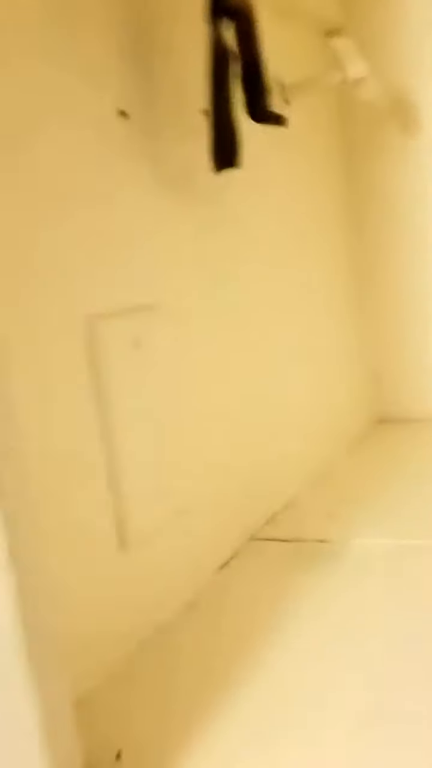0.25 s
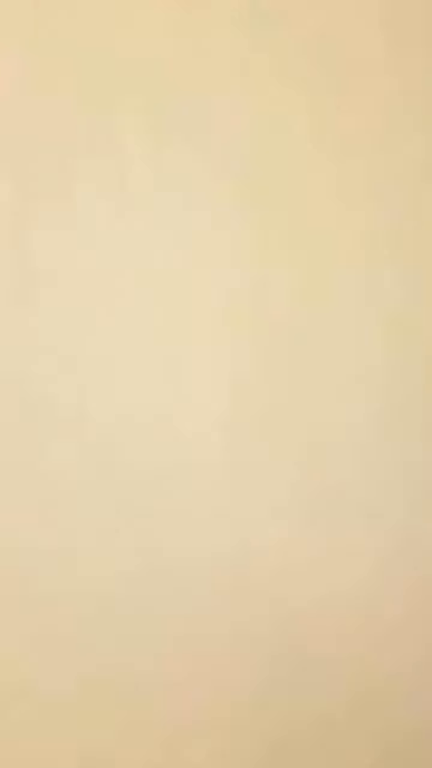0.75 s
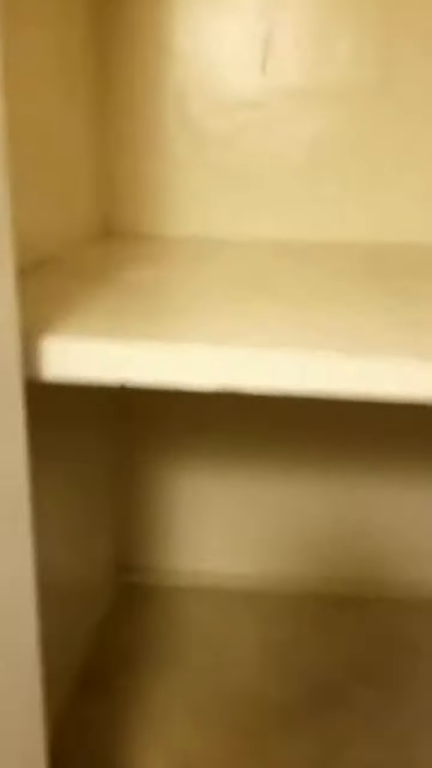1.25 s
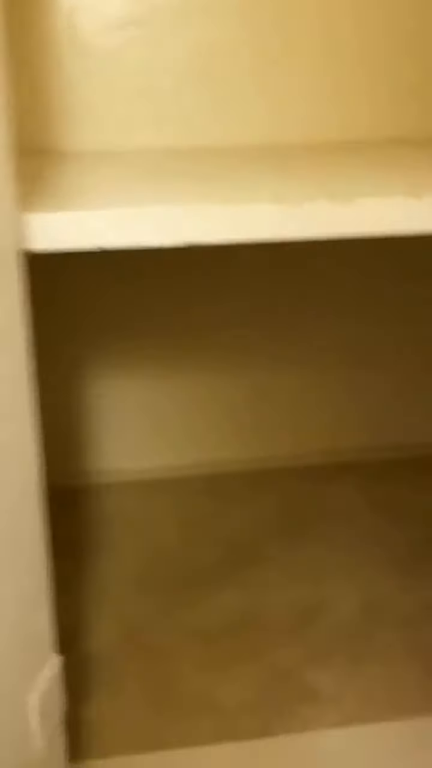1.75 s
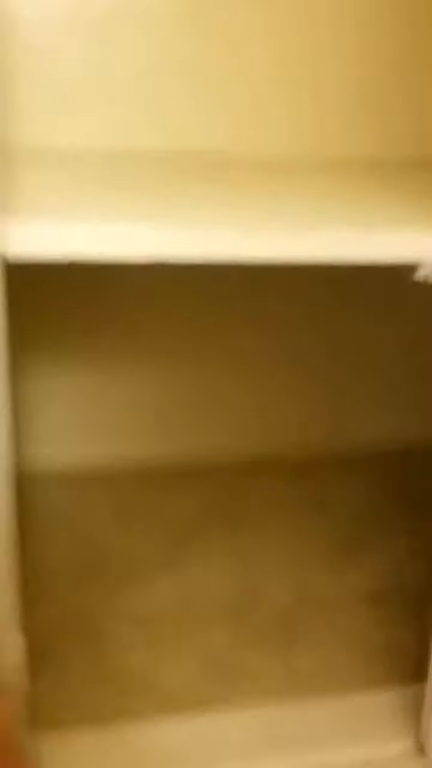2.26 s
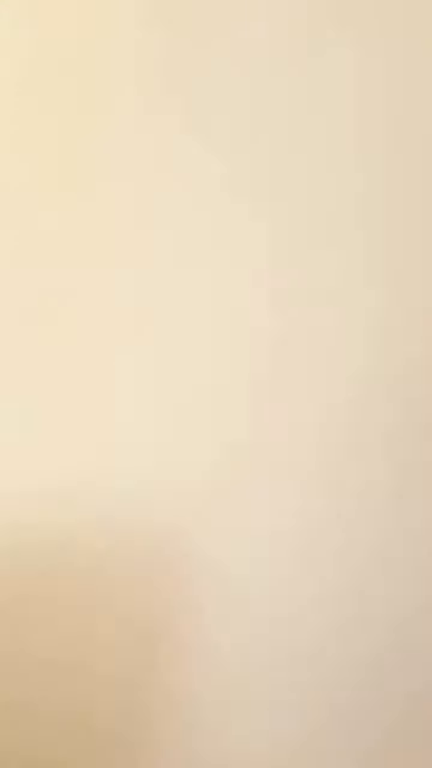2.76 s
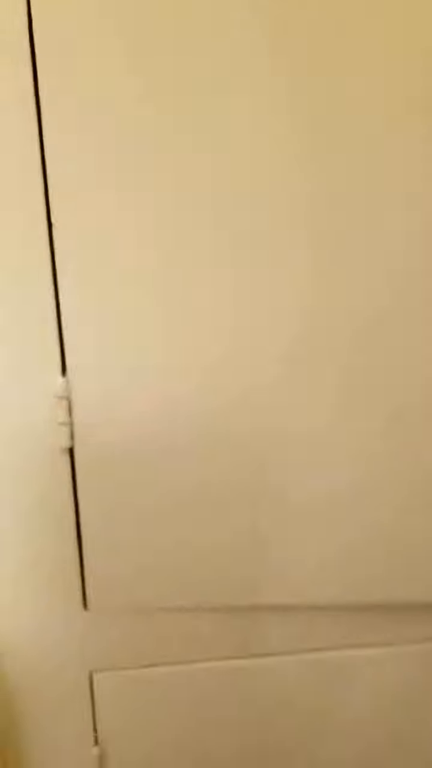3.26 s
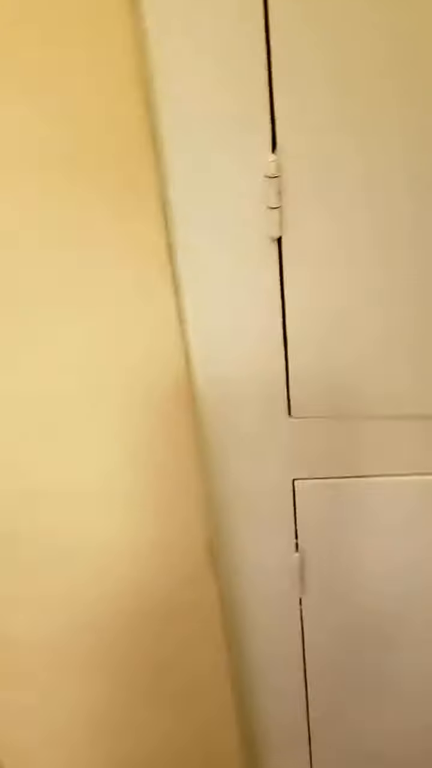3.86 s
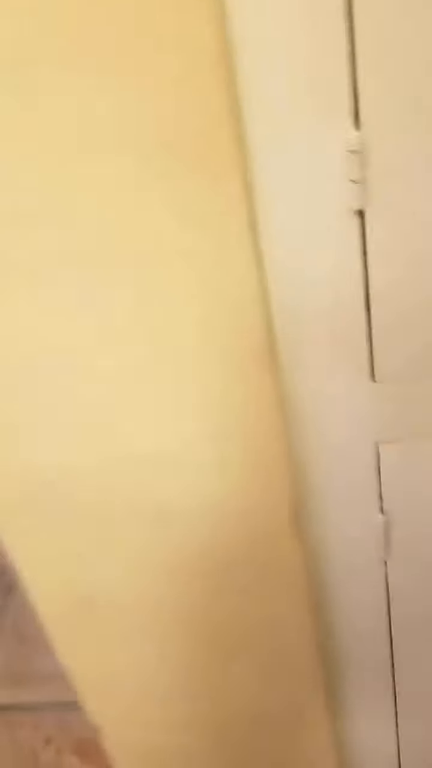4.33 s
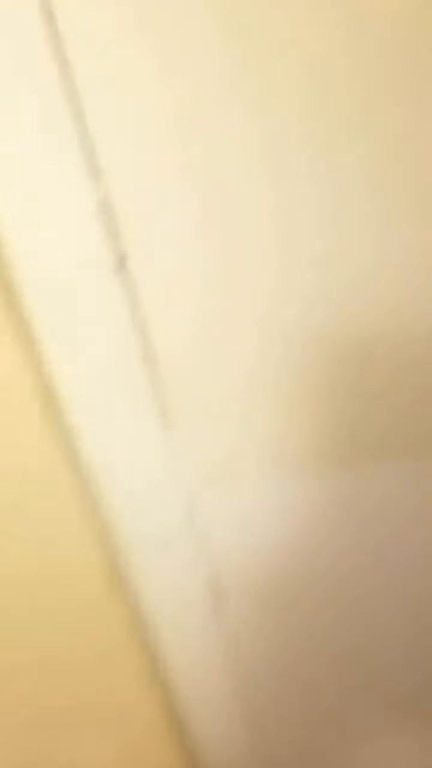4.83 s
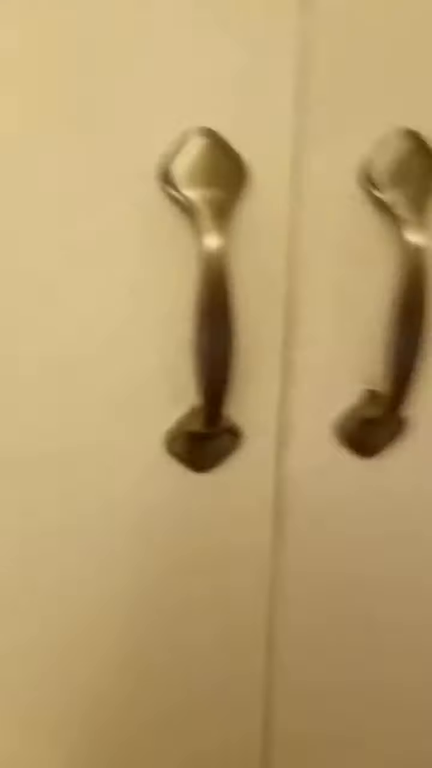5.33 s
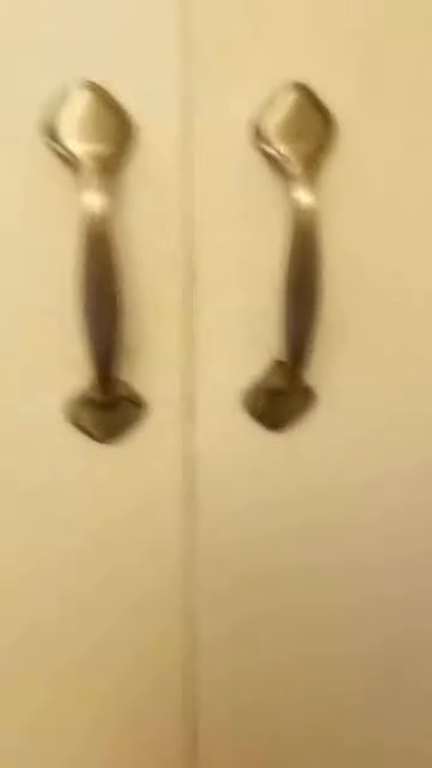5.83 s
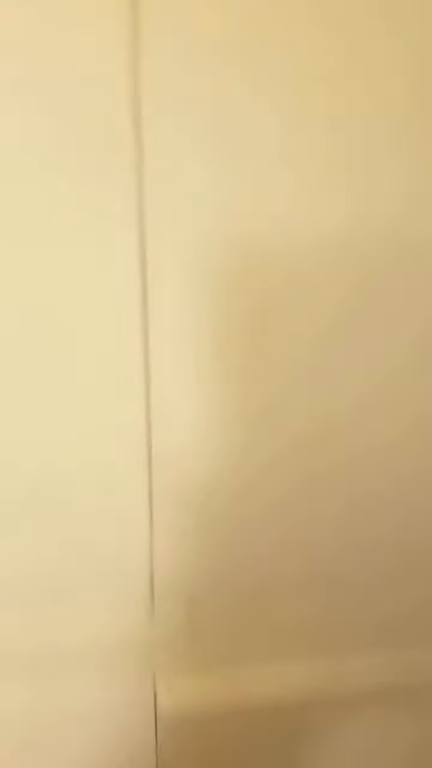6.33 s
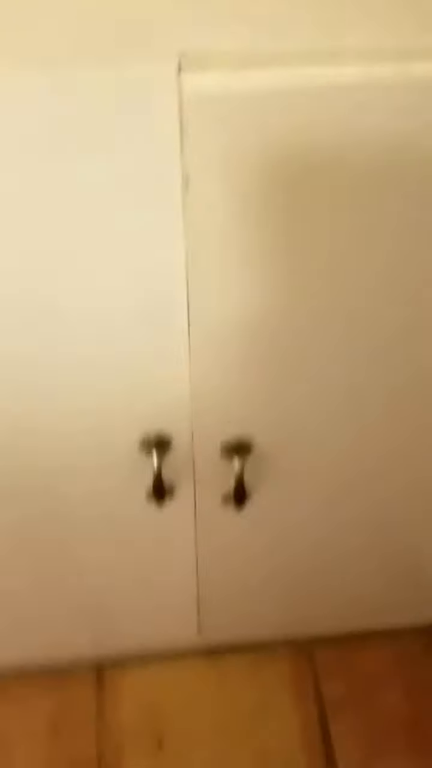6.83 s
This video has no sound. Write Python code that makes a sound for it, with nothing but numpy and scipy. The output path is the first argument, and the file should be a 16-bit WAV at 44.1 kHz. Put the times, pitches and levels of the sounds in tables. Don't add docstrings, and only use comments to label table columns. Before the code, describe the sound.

Soft cloth rustle and a few light knocks, then a sharp wooden door slam with a long echo. Scuffing feet lead to a second, clattering slam, and soon a third, loudest, which springs back and bangs again. The echo fades under quiet rustling, scrapes and dull final knocks. Stereo phone pickup, close, in an empty hard-walled house.

```python
import sys
import numpy as np
from scipy import signal
from scipy.io import wavfile
from scipy.ndimage import uniform_filter1d

SR = 44100
rng = np.random.default_rng(int(sys.argv[2]) if len(sys.argv) > 2 else 0)


def wav_record(signal):
    frames = np.transpose(np.atleast_2d(signal))
    bounded = np.clip(frames, -1, 1)
    quanta = np.round(bounded * 32767).astype(np.int16)
    wavfile.write(sys.argv[1], SR, quanta)


def invert_db(level):
    return 10 ** (np.asarray(level, dtype=float) / 20)


N = 312644


def evened(x):
    return x / np.sqrt(np.mean(x ** 2) + 1e-20)


def read(points, hz):
    f, value = np.transpose(points)
    return np.interp(np.log(hz + 1), np.log(f + 1), value)


def add(mix, s, sound):
    part = mix[:, round(s * SR):][:, :sound.shape[1]]
    part += sound[:, :part.shape[1]]


def coloured(x, spectrum, peak_hz, peak_db):
    hz = abs(np.fft.fftfreq(2048, 1 / SR))
    resonance_db = peak_db * np.exp(-(np.log((hz + 1) / peak_hz) / 0.33) ** 2)
    db = np.maximum(read(spectrum, hz) + resonance_db, -100)
    response = np.exp(np.conj(signal.hilbert(np.log(invert_db(db)))))
    taps = np.fft.ifft(response).real[:1024]
    return signal.fftconvolve(x, taps[None] / np.linalg.norm(taps), axes=1)


def noise(length, field_db):
    # (frequency [Hz], correlation [-1..1])
    likeness = [(40, 0.89), (150, 0.88), (330, 0.96), (600, 0.54), (2000, 0.071), (12000, 0.062)]
    frames, hz = length // 64 + 5, np.fft.rfftfreq(1024, 1 / SR)[:, None]
    a, b, c, d = rng.standard_normal((frames // 4 + 4, 513, 4)).T
    same = np.clip(read(likeness, hz), -1, 1)
    left = a + 1j * b
    right = same * left + np.sqrt(1 - same ** 2) * (c + 1j * d)
    z = np.array([left, right])
    t = np.arange(z.shape[2]) * 256 / SR
    return signal.istft(z * invert_db(field_db(hz, t)), nperseg=1024, noverlap=768)[1][:, :length]


def strokes(rows):
    rise_share, stop_s = 0.38, 0.033
    start, length, level_db, sag_db = np.transpose(rows)[:4, :, None]
    t = np.arange(0, N + 64, 64) / SR - start
    rise = np.sin(np.pi / 2 * np.clip(t / (rise_share * length), 0, 1)) ** 2
    stop = np.exp(-np.maximum(t - length, 0) / stop_s)
    return invert_db(level_db + sag_db * np.clip(t / length, 0, 1)) * rise * stop


def blows(rattle):
    same = 0.25
    t = np.arange(4096) / SR
    uneven = invert_db(1.555 * rng.exponential(1, 4096).clip(0, 4))
    left, other = rng.standard_normal((2, 4096)) * uneven
    right = same * left + np.sqrt(1 - same ** 2) * other
    return np.array([left, right]) * np.exp(-(t / max(rattle, .001)) ** 2) / 1.823


def tick(rattle):
    # (frequency [Hz], level [dB per Hz])
    metal = [(2940, 2.5), (5000, -5.5), (6800, -8.5), (8180, -27), (11000, -18.5), (15500, -19)]
    snap = np.exp(-np.arange(4096) / SR / 0.0034) + 0.81
    return coloured(blows(rattle) * snap, metal, 8400, 7.0)


def contacts(rows, panel):
    # (frequency [Hz], level [dB per Hz])
    wood = [(180, -24.5), (300, -2.5), (447, -4.5), (675, -3), (743, -7), (1220, -9.5), (1500, -10.5),
            (1940, -10), (3920, -21.5), (8000, -43.5), (10400, -56), (17600, -120)]
    tick_under_db = -28
    out, t = np.zeros((2, N)), np.arange(SR // 2) / SR
    bass = signal.butter(2, 450, fs=SR)
    modes = np.array([invert_db(db - 60 * t / t60) * np.exp(2j * np.pi * hz * t) for hz, db, t60 in panel])
    swing = 1 - np.exp(-t / 0.006)
    for s, crack_db, panel_db, rattle, crack_hz in rows:
        crack = coloured(blows(rattle), wood, crack_hz, 7.35)
        crack[1] += signal.lfilter(*bass, crack[0] - crack[1])
        add(out, s, invert_db(crack_db) * (crack + invert_db(tick_under_db) * tick(rattle)))
        phases = np.exp(1j * rng.uniform(-0.19, 1, len(panel)))
        ring = (phases @ modes).imag
        add(out, s, invert_db(panel_db) * ring[None] * swing)
    return out


def quiet():
    # (frequency [Hz], level [dB per Hz])
    wash = [(15, -31.5), (30, 10.5), (126, 6), (300, -7), (900, -11.5), (1600, -16.5), (2600, 1),
            (6700, -20.5), (9500, -31.5), (15500, -21)]
    wash_db, hum_db, hum_hz = -59, -68.5, 120
    wobble = evened(uniform_filter1d(rng.standard_normal(N), 3000))
    hum = invert_db(hum_db + 4.7 * wobble) * np.sin(2 * np.pi * hum_hz * np.arange(N) / SR)
    return invert_db(wash_db) * evened(noise(N, lambda hz, t: read(wash, hz) + 0 * t)) + hum


def feet():
    # (start [s], length [s], level [dB], sag over the scrape [dB])
    scrapes = [(-.04, 0.19, -60.5, -11), (.34, 0.12, -62, 2), (.69, .04, -53, -1), (.76, 0.2, -58.5, -1.5),
               (1.03, 0.15, -60, 8.5), (1.18, 0.26, -61.5, 10.5), (2.2, 0.63, -53, -15),
               (2.72, 0.074, -47.5, -6), (2.82, 0.17, -56, 0.5), (2.995, 0.17, -50, -16.5),
               (5.14, .28, -53, -6), (5.42, .35, -57.5, 5.5), (5.79, 0.32, -49.5, -25),
               (6.78, 0.27, -57, -1.5)]
    # (frequency [Hz], level [dB per Hz])
    scuff = [(90, -27.5), (180, -4.5), (450, -5), (900, -10.5), (1800, -20.5), (4000, -42.5)]
    level = np.repeat(strokes(scrapes).sum(0), 64)[:N]
    return level * evened(noise(N, lambda hz, t: read(scuff, hz) + 0 * t))


def cloth():
    # (start [s], length [s], hiss [dB], sag over the stroke [dB], body above the hiss [dB])
    rubs = [(-.08, .3, -70, -1.5, 3.5), (0.193, 0.46, -44, -29.5, 12.5), (0.682, 0.22, -54, -3.5, -6.5),
            (0.933, 0.37, -65.5, -2, -8.5), (1.196, 0.22, -43, -10, 3.5), (1.607, 0.063, -59.5, -14, 5),
            (2.048, 0.023, -72, 5, -10), (2.131, 0.24, -59.5, -12.5, -4.5), (2.48, 0.16, -74, -3, -12.5),
            (2.651, 0.31, -70, -5.5, 9), (3.1, 0.31, -62.5, -14, 3.5), (3.53, 0.039, -60, -3.5, -1.5),
            (3.802, 0.13, -61, -20, -9.5), (4.78, 0.12, -47, -16.5, -6), (4.96, 0.54, -69.5, -25, 1.5),
            (5.384, 0.19, -63, -10.5, 5.7), (5.584, 0.11, -58.5, 2, -5), (5.732, 0.4, -76.5, -1, 14.5),
            (6.066, 0.24, -67, -7, 2), (6.275, 0.29, -57, -15.5, 3.5), (6.57, 0.18, -51.5, -4, -3),
            (6.696, 0.13, -68, -1.5, 14.5), (6.804, 0.25, -53, -17.5, -4)]
    # (frequency [Hz], level [dB per Hz])
    swish = [(180, -46.5), (300, -27.5), (620, -18.5), (800, -16), (1640, -11), (2250, -5.5), (3800, -7.5),
             (6600, -7.5), (8700, -18.5), (11000, -19), (15700, -18.5)]
    # (frequency [Hz], share [0..1])
    body_share = [(400, 0.67), (2500, 0.84), (5000, 0.18), (7500, 0.15), (11000, 0)]
    each = strokes(rubs) + 1e-9
    level, s = each.sum(0), np.arange(each.shape[1]) * 64 / SR
    body_db = np.transpose(rubs)[4] @ each / level
    grain = uniform_filter1d(rng.standard_normal((N // 256 + 9, 513)), 8, 0)
    patches = 1.2 * evened(uniform_filter1d(grain, 14, 1)).T

    def field_db(hz, t):
        body = read(body_share, hz) * np.interp(t, s, body_db)
        return read(swish, hz) + body + patches[:, :len(t)]

    rub = noise(N, field_db)
    hiss = signal.sosfilt(signal.butter(4, 8000, "high", fs=SR, output="sos"), rub)
    return rub * np.repeat(level, 64)[:N] / np.sqrt(np.mean(hiss ** 2))


def bump():
    start_s, level_db, tap_hz, pan_db = 2.869, -38, 111, 25
    t = np.arange(N) / SR - start_s
    tap = -np.exp(-(t / 0.0077) ** 2) * np.cos(2 * np.pi * tap_hz * t)
    return invert_db(level_db + np.array([[.5], [-.5]]) * pan_db) * tap


def catches():
    # (time [s], level [dB], rattle [s])
    clicks = [(.68, -46, .006), (.905, -43.5, .011), (1.47, -26.5, .035), (1.497, -46, .047),
              (2.071, -49, .02), (3.183, -35, .032), (3.267, -29, .03), (3.273, -27.5, .042),
              (3.284, -30.5, .01), (3.338, -34, .008), (3.372, -27, .003), (3.549, -45.5, .01),
              (3.805, -40.5, .0033), (4.142, -28, 0.032), (4.156, -30, 0.019), (4.26, -39.5, .02),
              (4.295, -31.5, .046), (4.319, -30, .0031), (4.329, -21.5, 0.0023), (4.418, -39, .008),
              (4.793, -36, .02)]
    out = np.zeros((2, N))
    for s, db, rattle in clicks:
        add(out, s, invert_db(db) * tick(rattle))
    return out


def knocks():
    # (time [s], crack [dB], panel [dB], rattle [s], crack resonance [Hz])
    taps = [(.455, -40, -57, 0.037, 620), (.497, -31, -42.5, 0.013, 1160), (.515, -37, -65, 0.025, 890),
            (.5, -36, -62.5, .03, 257), (.6, -61, -52, .03, 300), (1.15, -51, -53, 0.012, 485),
            (1.19, -64, -50, 0.015, 500), (2.748, -52.5, -51.5, 0.042, 715), (3.15, -45, -47, 0.007, 2523),
            (3.183, -42, -52, 0.04, 2470), (3.549, -66, -52.5, .01, 3754),
            (3.806, -54.5, -45.5, 0.003, 4140), (6.70, -70, -46, 0.026, 496),
            (6.735, -47, -37.5, 0.051, 583), (6.775, -48.5, -35, 0.073, 566), (6.85, -53, -44.5, 0.11, 553)]
    # (frequency [Hz], level [dB], t60 [s])
    boards = [(67.6, 5, 0.36), (110.6, 3.5, 0.31), (187, -6.5, 0.18), (400, -18.5, 0.25)]
    return contacts(taps, boards)


def first_door():
    # (time [s], crack [dB], panel [dB], rattle [s], crack resonance [Hz])
    hits = [(1.458, -9.5, -13, 0.026, 1000), (1.468, -10, -8, 0.046, 2240),
            (1.483, -16, -16.5, 0.065, 1270), (1.497, -17.5, -6, 0.091, 875),
            (1.53, -28, -13.5, 0.023, 1320)]
    # (frequency [Hz], level [dB], t60 [s])
    panel = [(45, -17.5, 0.3), (94, 1.5, 0.11), (121, -3, 0.2), (160.6, -10, 0.11), (250.4, -4, 0.21),
             (338, -4, .1), (390.3, -5, 0.21), (570, -25, 0.94)]
    return contacts(hits, panel)


def second_door():
    # (time [s], crack [dB], panel [dB], rattle [s], crack resonance [Hz])
    hits = [(3.266, -11.5, -12, 0.067, 2440), (3.275, -11, -13.5, 0.038, 1390),
            (3.285, -19, -13, 0.0073, 2470), (3.298, -18.5, -11.5, 0.13, 1014),
            (3.333, -14, -33, 0.021, 2350), (3.338, -5, -9, 0.019, 400), (3.362, -24, -16, 0.02, 2380)]
    # (frequency [Hz], level [dB], t60 [s])
    panel = [(42.5, -9, 0.29), (87.3, 5, 0.075), (191.4, 1, 0.2), (261, 1, 0.08), (362.6, 1, 0.091),
             (437.6, -1.5, 0.056), (504.4, 1, 0.04)]
    return contacts(hits, panel)


def third_door():
    # (time [s], crack [dB], panel [dB], rattle [s], crack resonance [Hz])
    hits = [(4.137, -5.5, -6.5, 0.014, 1600), (4.157, -2.5, -7.5, 0.011, 1360),
            (4.19, -24, -24.5, 0.035, 1310), (4.322, -8.5, -8.5, 0.0017, 2480),
            (4.328, -2.5, -15.5, 0.0036, 2260), (4.334, -4.5, -29.5, 0.0086, 2390),
            (4.349, -15.5, -19.5, 0.0073, 2330), (4.42, -25, -24.5, 0.0038, 1500)]
    rebound = [(4.222, -15.5, -12, 0.021, 1290), (4.26, -21, -9.5, 0.079, 700),
               (4.294, -23.5, -8.5, 0.07, 1025)]
    # (frequency [Hz], level [dB], t60 [s])
    panel = [(52, -21, 1), (91.2, -9.5, 0.18), (138.7, -3, 0.13), (194.7, 1, 0.09), (270.5, -9, 0.48),
             (408.5, -6.5, 0.13), (589, -2.5, 0.099)]
    hinged = [(130.7, 0, 0.11), (187.4, -2, 0.18), (273, -19, 0.15), (416, -14.5, 0.39)]
    return contacts(hits, panel) + contacts(rebound, hinged)


def house(x):
    # (frequency [Hz], t60 [s])
    decay = [(40, 1.88), (120, 1.165), (300, 1.706), (1000, 1.903), (2500, 1.464), (4500, 1.04),
             (8000, 0.51), (14000, 0.45)]
    nook_db, nook_t60 = 5, 0.18
    length = 3 * SR // 2

    def field_db(hz, t):
        far = invert_db(-60 * t / read(decay, hz))
        nook = invert_db(nook_db - 60 * t / nook_t60)
        return 20 * np.log10(far + nook)

    tail = noise(length, field_db)
    tail *= 1 - np.exp(-np.arange(length) / SR / 0.0027)
    return signal.fftconvolve(x, tail / np.linalg.norm(tail[0]), axes=1)[:, :N]


def scene():
    doors = [first_door(), second_door(), third_door()]
    handling, rub = knocks() + catches(), cloth()
    sources = doors + [handling + invert_db(3.5) * rub]
    wet_db = (-2.4, -2.1, 1.5, -0.48)
    echoes = sum(invert_db(db) * house(x) for db, x in zip(wet_db, sources))
    return sum(doors) + handling + rub + invert_db(-4) * echoes + bump() + feet() + quiet()


def low_pass(x):
    return signal.sosfilt(signal.butter(12, 16650, fs=SR, output="sos"), x)


def record(dry):
    ceiling, mic_low_hz, edge_hz = 0.95, 38, 15740
    power_db = 10 * np.log10(abs(uniform_filter1d((dry ** 2).mean(0), 300)) + 1e-12)
    fall = np.arange(N) * 60. / SR
    held_peak_db = np.maximum.accumulate(power_db + fall) - fall
    over_db = np.maximum(held_peak_db + 13, 0)
    held = dry / invert_db(0.27 * uniform_filter1d(over_db, 100))
    held = signal.lfilter(*signal.butter(2, mic_low_hz, "high", fs=SR), held)
    clipped = 1.54 * ceiling * np.tanh(held / (1.463 * ceiling))
    edge = signal.firwin(767, edge_hz, window=("kaiser", 8), fs=SR)
    return low_pass(signal.oaconvolve(clipped, edge[None], "same", axes=1))


dry = scene()
out = record(dry)
wav_record(out)
```